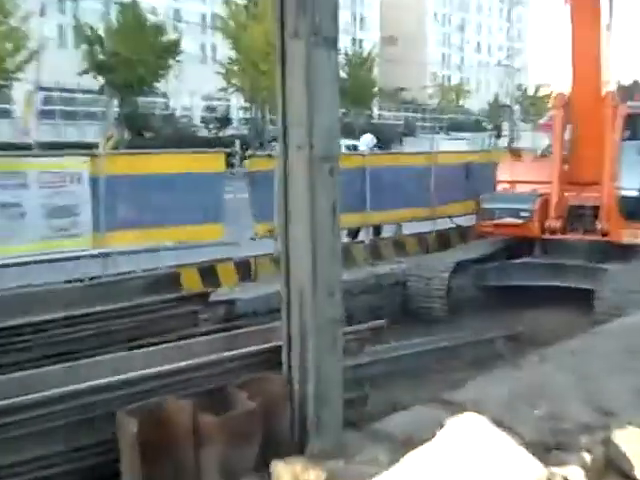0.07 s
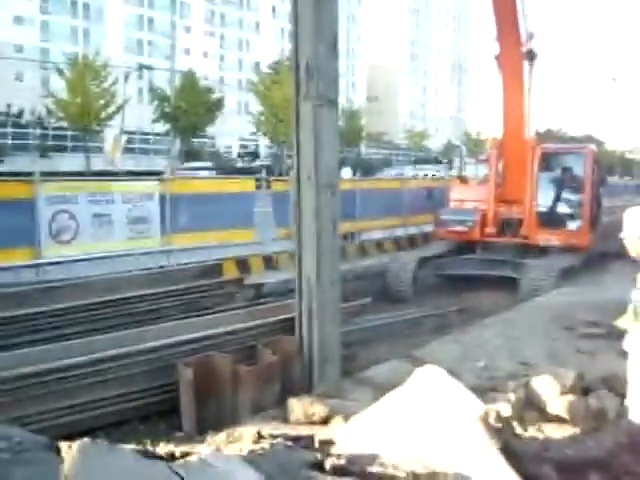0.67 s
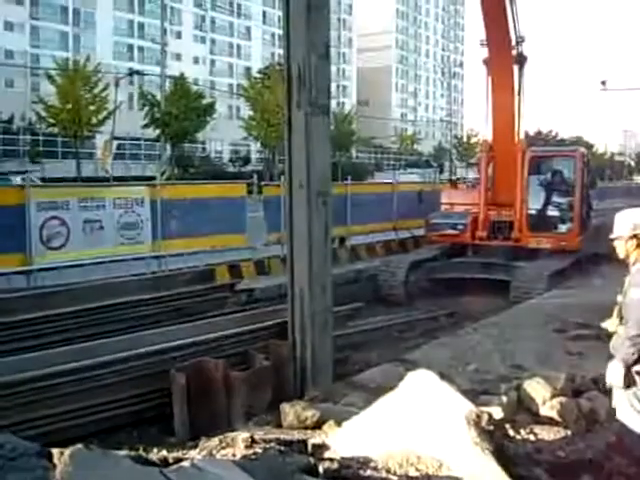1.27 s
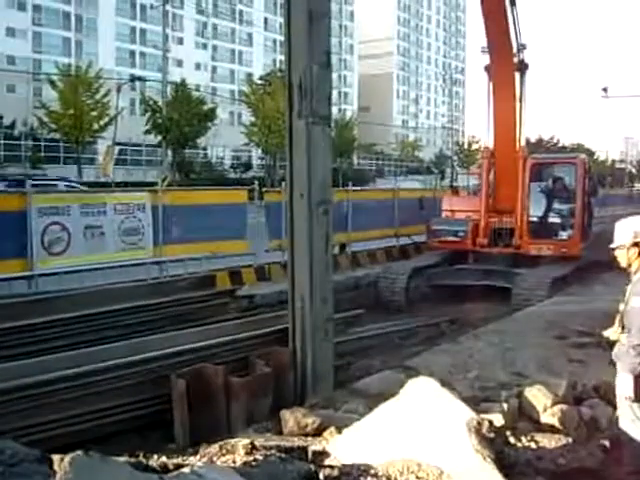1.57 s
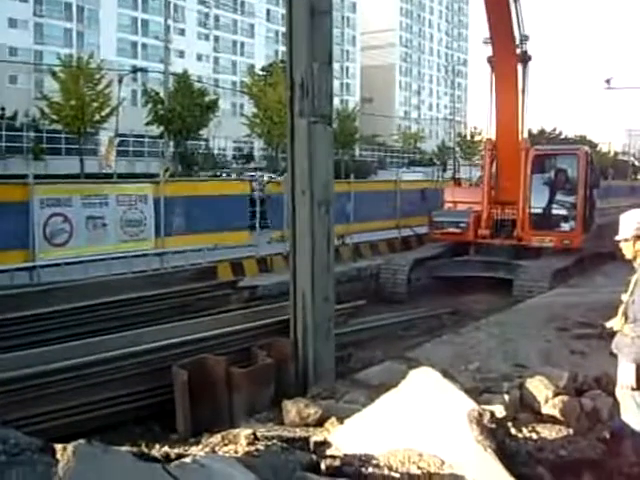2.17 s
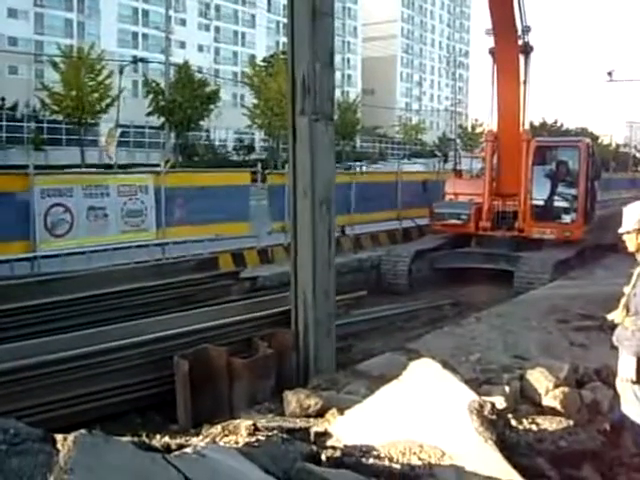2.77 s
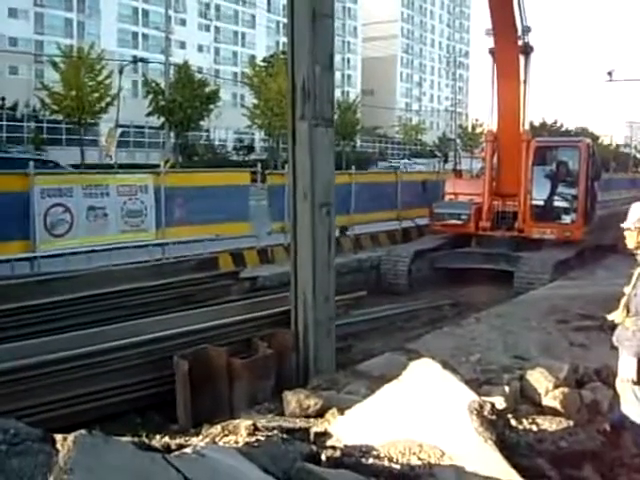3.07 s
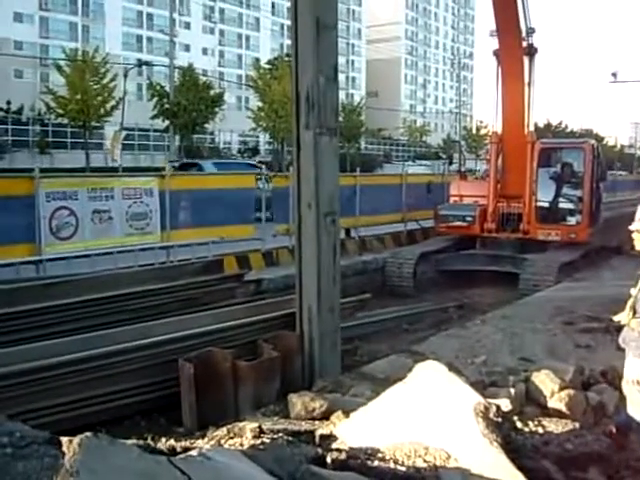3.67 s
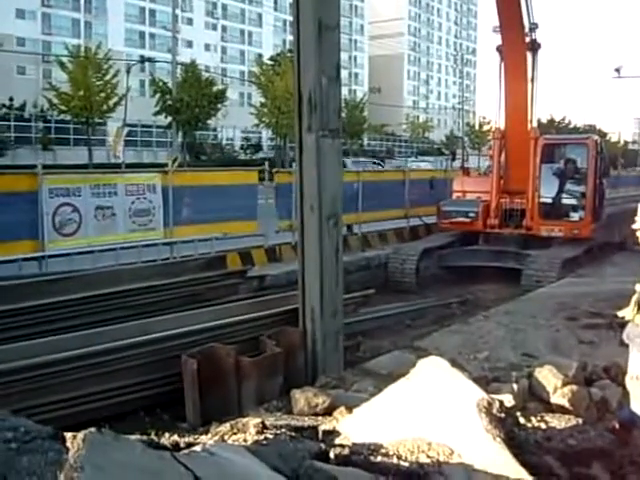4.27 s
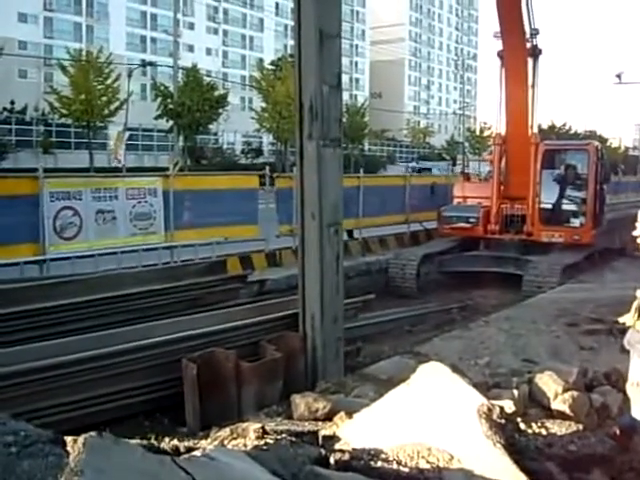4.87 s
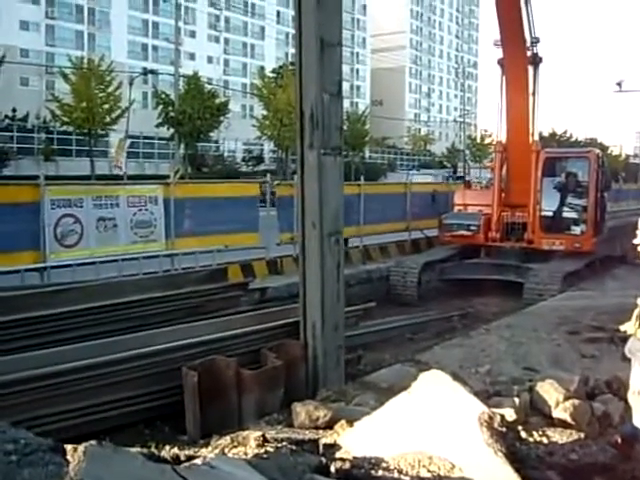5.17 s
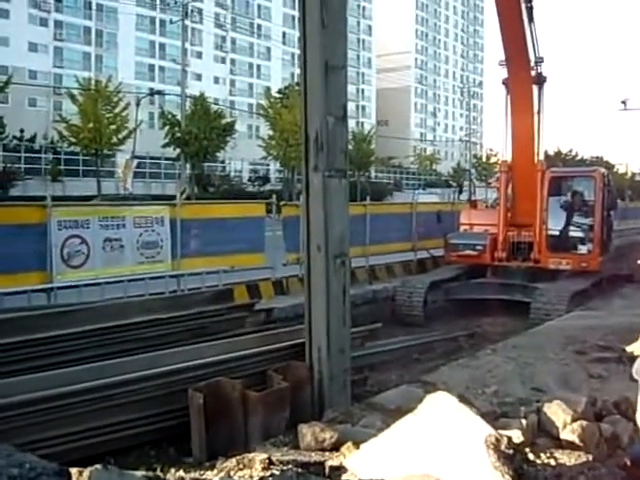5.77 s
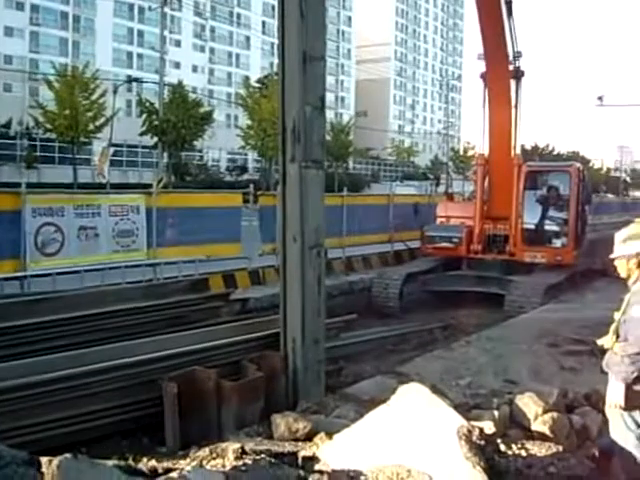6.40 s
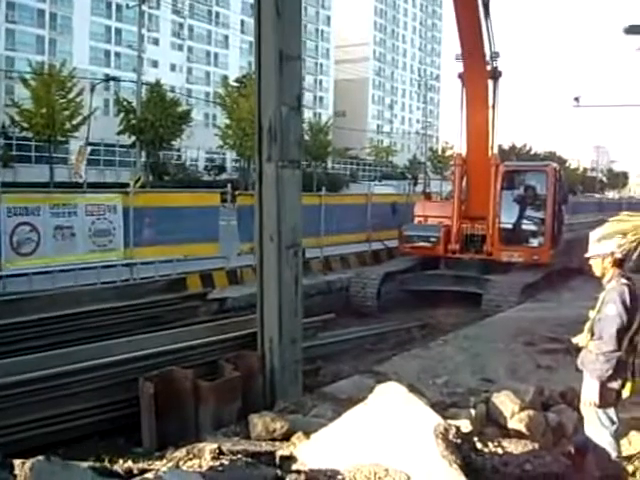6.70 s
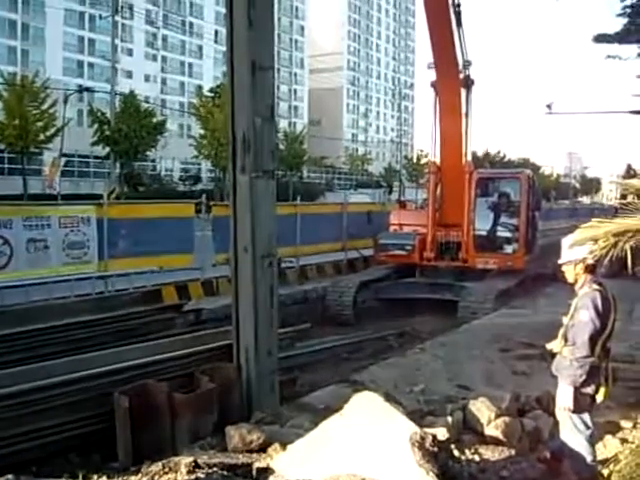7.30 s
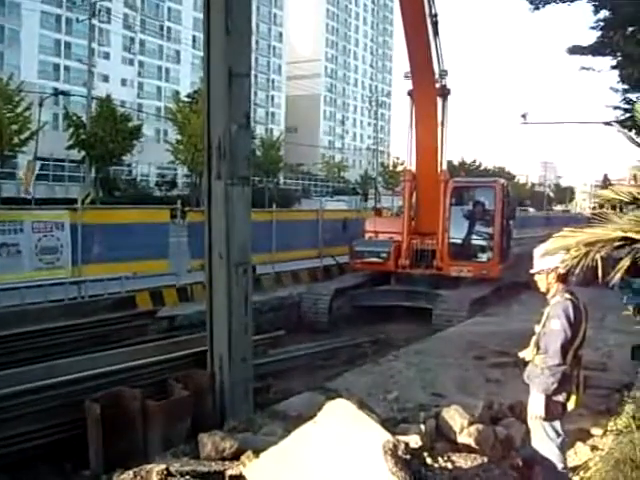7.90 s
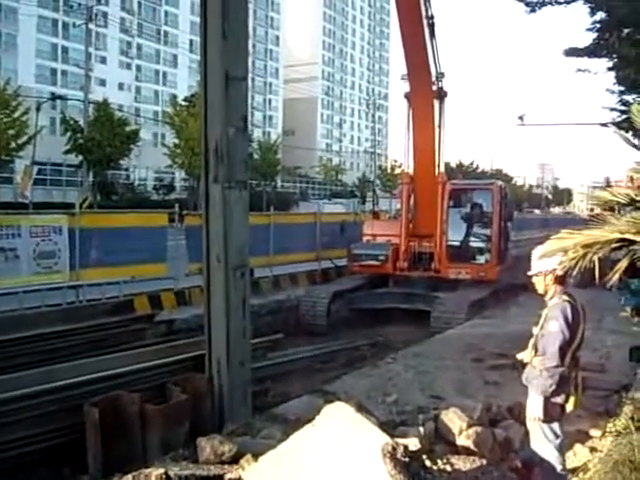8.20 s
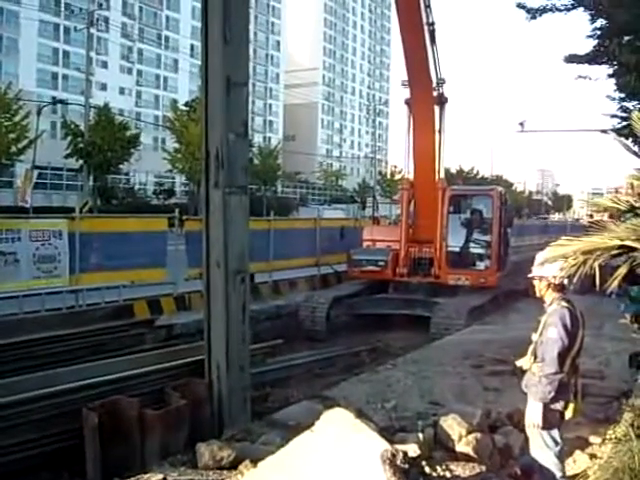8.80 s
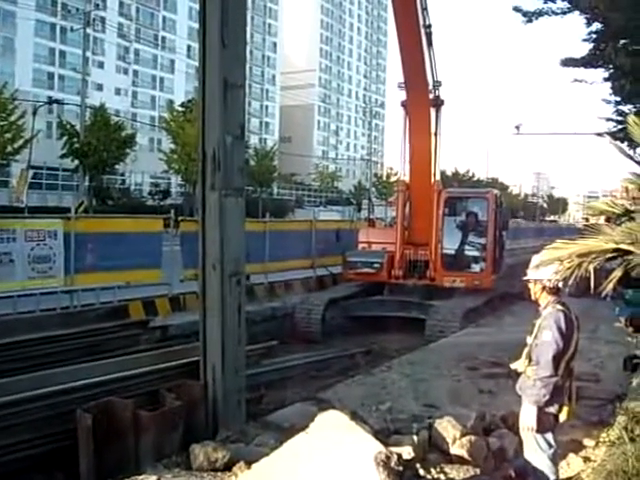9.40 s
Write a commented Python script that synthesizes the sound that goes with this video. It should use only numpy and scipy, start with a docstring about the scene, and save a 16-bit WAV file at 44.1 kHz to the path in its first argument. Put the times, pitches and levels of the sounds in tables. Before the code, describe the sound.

A vibratory pile hammer hums loudly over a diesel excavator, with rapid steel clanking and grinding that ease as the hum rises.

```python
"""Vibratory pile driver

A hammer on an excavator shakes a steel pile into the ground. Its spinning weights hum through
boom and frame. While the pile binds it grinds and clanks once a stroke, twice when wedged.
The load eases: the clanks stop and the hum climbs over the diesel until the pile catches again."""
import sys
import numpy as np
from scipy import signal
from scipy.fft import rfft, irfft, next_fast_len
from scipy.io import wavfile
from scipy.ndimage import map_coordinates

SR = 44100
rng = np.random.default_rng(int(sys.argv[2]) if len(sys.argv) > 2 else 0)


def dump_mix(stems):
    """Bounce the given channels to the path in sys.argv[1] as a 16-bit WAV at rate SR."""
    frames = np.atleast_2d(stems).T  # one column per channel
    limited = np.clip(frames, -1, 1)  # hard clip at full scale
    pcm = np.round(limited * 32767).astype(np.int16)
    wavfile.write(sys.argv[1], SR, pcm)


N = 425565
TIME = np.arange(N) / SR
START_S = 0.888  # silent until here
LOADED_HZ = 36  # shaft speed under load
# Distinct steel-on-steel blows, mostly heavy, with two light knocks.
# Each row: start in seconds, level in dB, ring pitch in Hz.
DISTINCT_BLOWS = [(0.97, -18, 4080), (1.063, -15.5, 4140), (1.087, -13, 3940), (1.109, -13, 4010),
                  (1.122, -11.5, 3870), (1.229, -13.5, 4330), (1.256, -12, 4090), (2.496, -19.5, 4180),
                  (2.58, -16.5, 4730), (2.636, -17, 3940), (2.8, -14.5, 4520), (3.159, -16, 4400),
                  (3.215, -16.5, 4260), (3.268, -17, 4400), (3.728, -18, 4370), (4.043, -17.5, 4020),
                  (4.096, -17, 4170), (4.401, -17.5, 4180), (5.234, -22, 4130), (5.703, -18.5, 4230),
                  (5.815, -27.5, 4460), (7.8, -28.5, 3770), (9.358, -17.5, 5000)]


def amp(db):
    """Decibels to gain."""
    return 10 ** (np.asarray(db) / 20)


def unit(x):
    """Scale to rms 1."""
    return x / np.sqrt(np.mean(x ** 2) + 1e-20)


def curve(rows):
    """(seconds, value) points to one value per sample."""
    return np.interp(TIME, *np.transpose(rows))


def wobble(rate_hz):
    """Smooth random curve, rate_hz knots a second."""
    knots = rng.standard_normal(int(N * rate_hz / SR) + 4)
    coarse_s = TIME[::32]
    return np.interp(TIME, coarse_s, map_coordinates(knots, [coarse_s * rate_hz]))


def filtered(x, response):
    """Zero-phase filter of gain response(hz)."""
    size = next_fast_len(N + SR // 4)
    return irfft(rfft(x, size) * response(np.fft.rfftfreq(size, 1 / SR)), size)[:N]


def noise(spectrum):
    """Noise of rms 1, coloured by (Hz, dB) points."""
    hz, db = np.transpose(spectrum)
    colour = lambda f: amp(np.interp(np.log(f + 1), np.log(hz), db))
    return unit(filtered(rng.standard_normal(N), colour))


def resonances(modes, hz):
    """Gain of steep-skirted (Hz, half-width Hz, dB) modes."""
    return np.sqrt(sum(amp(db) ** 2 / (1 + ((hz - centre) / width) ** 2) ** 2
                       for centre, width, db in modes))


def machine(speed_hz, turns, force_db):
    """Pile rumble, diesel and gear roar, and hydraulic hiss, all beating with the shaft."""
    # Spectra. Each row: frequency in Hz, relative density in dB.
    rumble_spectrum = [(22, -60), (40, -21), (80, -22), (115, -5), (165, 5), (230, 3), (310, 5.5),
                       (400, -4.5), (550, -28), (900, -48)]
    roar_spectrum = [(300, -17.5), (520, -11), (660, 1), (730, -6), (800, 0), (880, -7.5), (1550, -7.5),
                     (1850, -10), (2600, -31.5), (4500, -41)]
    hiss_spectrum = [(1500, -4), (2600, -0.5), (3500, 3), (4400, 1.5), (5300, -4), (6300, -7.5),
                     (7800, -15), (10500, -15.5), (12000, -92)]
    # Diesel and gears. Each row: time in seconds, level in dB.
    roar_levels = [(.9, -26), (2, -26), (3, -33.5), (4.2, -26), (5.3, -27.5), (6.3, -31), (7.5, -29.5),
                   (8.8, -30), (9.35, -25)]
    rumble_db = -34 - 0.78 * (speed_hz - LOADED_HZ) + force_db  # fades as the load eases
    hiss_db = -39.5 + 0.2342 * (speed_hz - LOADED_HZ)
    clatter_db = 1.23 * np.cos(2 * np.pi * 3 * turns) + wobble(120)
    pulse_db = 1.5 * np.cos(2 * np.pi * turns)
    rumble = amp(rumble_db) * unit(noise(rumble_spectrum) * amp(pulse_db))
    roar_db = curve(roar_levels) + 0.17 * wobble(6.4)
    roar = amp(roar_db) * unit(noise(roar_spectrum) * amp(clatter_db))
    hiss = amp(hiss_db) * unit(noise(hiss_spectrum) * amp(1.28 * clatter_db))
    return rumble + roar + hiss


def squeaks(width_hz=1000, grit_db=4):
    """Steel rubs on steel: brief, gritty swells of many close modes."""
    # Each row: centre in seconds, half-length in seconds, pitch in Hz, level in dB.
    rubs = [(2.428, 0.018, 6340, -35.5), (4.794, 0.022, 5850, -32), (4.865, 0.031, 6200, -37),
            (5.585, 0.13, 8350, -43.5), (5.724, 0.095, 3140, -36), (5.905, 0.046, 9250, -47),
            (7.231, 0.039, 3460, -35), (9.397, 0.068, 5015, -38), (9.427, 0.22, 6650, -36),
            (9.52, 0.22, 2400, -33.5)]
    band = lambda hz: 1 / (1 + (2 * hz / width_hz) ** 2)
    real, imag = (unit(filtered(rng.standard_normal(N), band)) for _ in range(2))
    modes = (real + 1j * imag) * unit(amp(grit_db * wobble(250)))
    out = np.zeros(N)
    for centre_s, half_s, hz, db in rubs:
        near = np.abs(TIME - centre_s) < half_s
        t = TIME[near] - centre_s
        envelope = amp(db) * np.cos(np.pi / 2 * t / half_s) ** 2
        out[near] += envelope * np.real(modes[near] * np.exp(2j * np.pi * hz * t))
    return out


def binding(attack_s=0.034, release_s=0.054):
    """The pile binds on its neighbours. Returns knock gain, grind gain and return-stroke share."""
    # Each row: start in seconds, length in seconds, knock in dB, grind in dB, return-stroke share 0-1.
    binds = [(0.977, .06, -23.5, -27, .6), (1.054, 0.098, -18.5, -23, 0.65),
             (1.178, 0.24, -21.5, -26.5, 0.59), (1.45, 0.14, -28.5, -29, 0.57), (1.624, 0.11, -35, -25, 1),
             (1.817, 0.25, -26.5, -28.5, 0.26), (2.094, 0.31, -27.5, -31.5, 0.24),
             (2.47, 0.73, -20.5, -29, 0.14), (3.206, .13, -21, -25, 0.22), (3.459, 0.14, -24, -26, 0.06),
             (3.817, 0.29, -22, -28, 0.07), (4.202, 0.26, -24, -28, .05), (4.497, 0.27, -36, -30, .1),
             (4.868, 0.18, -26, -24.5, 0.98), (5.193, 0.35, -31.5, -30.5, 1), (5.426, .12, -26, -26, 0.6),
             (5.596, 0.082, -23, -45, 0), (9.325, 0.25, -27, -39, 0.9)]
    start_s, length_s, knock_db, grind_db, share = np.transpose(binds)[:, :, None]
    grip = np.clip((TIME - start_s) / attack_s + 0.5, 0, 1)
    grip *= np.exp(-np.maximum(TIME - start_s - length_s, 0) / release_s)
    knock = grip * amp(knock_db)
    wedged = (knock * share).sum(axis=0) / (knock.sum(axis=0) + 1e-9)
    return knock.max(axis=0), (grip * amp(grind_db)).max(axis=0), wedged


def scraping(knock, wedged, level_db=-7):
    """A pile wedged enough to touch on both strokes also scrapes brightly."""
    # Each row: frequency in Hz, relative density in dB.
    spectrum = [(1800, -1.5), (3300, 10), (6000, -1), (8500, -4), (11500, -19)]
    grit = amp(5 * wobble(300))
    return amp(level_db) * knock * wedged * unit(noise(spectrum) * grit)


def grinding(turns, grind, force_db, rough_db=1.5, stroke_db=2, patchy_db=3, free_db=-34.5):
    """Rough steel slips on every stroke and rings the pile, lightly even when it slides freely."""
    # Each row: frequency in Hz, half-width in Hz, relative level in dB.
    pile_modes = [(688, 42, 7.5), (779, 16, 3), (915, 33, 4), (1232, 47, 1.5), (1257, 90, -1.5),
                  (1478, 11, 5), (1536, 160, -5), (1814, 250, 1), (2240, 102, -6)]
    slips = rng.standard_normal(N) * amp(rough_db * wobble(220) + stroke_db * np.cos(2 * np.pi * turns))
    ringing = np.zeros(N)
    for mode in pile_modes:
        ringing += amp(patchy_db * wobble(6.8)) * filtered(slips, lambda hz: resonances([mode], hz))
    return np.hypot(grind, amp(free_db + force_db)) * unit(ringing)


def wall_ring(crashes, decay_s=0.012):
    """The pile's wall rings on briefly after each contact."""
    # Each row: frequency in Hz, relative level in dB.
    wall_modes = [(3480, 26), (4050, 10), (4255, -28), (4480, -34), (4720, 23), (5006, 23.5)]
    t = np.arange(SR // 10) / SR
    response = sum(amp(db) * np.sin(2 * np.pi * hz * t) for hz, db in wall_modes) * np.exp(-t / decay_s)
    return np.std(crashes) * unit(signal.fftconvolve(crashes, response)[:N])


def knocks(turns, knock, wedged, scatter_db=2.44, jitter_s=0.00055):
    """Contacts (s, dB, Hz) on the down and return strokes, in step with the distinct blows."""
    blow_s, _, blow_hz = np.transpose(DISTINCT_BLOWS)
    contact_turns = np.unwrap(np.interp(blow_s, TIME, turns) % 1, period=1)
    half_stroke = np.floor(2 * (turns - np.interp(TIME, blow_s, contact_turns)))
    at = np.flatnonzero(np.diff(half_stroke) > 0) + 1
    chance = rng.standard_normal((len(at), 3))
    start_s = TIME[at] + jitter_s * chance[:, 0]
    gain = knock[at] * np.where(half_stroke[at] % 2, wedged[at], 1)
    db = 20 * np.log10(gain + 1e-9) + scatter_db * chance[:, 1]
    spread = 0.039 + 0.095 * wedged[at]  # a wedged pile touches in many places
    hz = np.interp(start_s, blow_s, blow_hz) * np.exp(spread * chance[:, 2])
    clear_of_blows = np.abs(start_s[:, None] - blow_s).min(axis=1) > 0.007
    return np.column_stack([start_s, db, hz])[clear_of_blows & (start_s > START_S)]


def clanks(turns, knock, wedged, attack_s=0.00042, decay_s=0.0058, tail_s=0.047):
    """Each contact is a broad crash and a short pitched clink; the site adds a tail."""
    # Each row: frequency in Hz, relative density in dB.
    crash_spectrum = [(300, -11.5), (700, -52), (1750, -2), (2600, -4.5), (3500, 1), (4500, 2),
                      (5600, -0.5), (9000, -14), (11500, -18)]
    t = np.arange(SR // 10) / SR
    direct = (1 - np.exp(-t / attack_s)) * np.exp(-t / decay_s)
    tail = amp(-17) * (1 - np.exp(-t / decay_s)) * np.exp(-t / tail_s)
    crash_env = np.hypot(direct, tail)
    clink_env = 1.45 * (1 - np.exp(-t / 0.0008)) * np.exp(-t / 0.004)
    waver_rad = 1.05 * wobble(700)  # the contact slides while it rings
    power, clinks = np.zeros(N), np.zeros(N)
    for start_s, db, hz in np.vstack([DISTINCT_BLOWS, knocks(turns, knock, wedged)]):
        first = round(start_s * SR)
        span = slice(first, first + len(t))
        size = len(power[span])
        power[span] += (amp(db) * crash_env[:size]) ** 2
        clinks[span] += amp(db) * clink_env[:size] * np.sin(2 * np.pi * hz * t[:size] + waver_rad[span])
    crashes = np.sqrt(power) * noise(crash_spectrum)
    return amp(-1.5) * crashes + amp(2) * clinks + amp(-8) * wall_ring(crashes)


def swell_db(order, edge_s=0.18):
    """Level offset of one harmonic of the hum: ramps in, holds, ramps out."""
    # Each row: start in seconds, length in seconds, offset in dB, harmonic number.
    swells = [(1.102, 0.46, 8.5, 7), (1.16, 0.42, 10, 12), (1.847, 2.4, 3.5, 8), (3.804, 1.2, 5.5, 2),
              (5.6, 1.52, 3.5, 2), (3.756, .8, 4.5, 6), (5.854, 0.21, 8.5, 19), (6.55, 1.3, 6.5, 10),
              (7.1, .55, 7, 11), (7.11, 0.66, 9, 15), (7.7, 0.74, 4.5, 4), (7.695, 0.66, 4.5, 9),
              (8.203, 0.96, 6.5, 5), (8.45, 1.1, -1, 22), (8.3, .85, 5.5, 20)]
    offset_db = np.zeros(N)
    for start_s, length_s, db, harmonic in swells:
        if harmonic == order:
            inside_s = np.minimum(TIME - start_s, start_s + length_s - TIME)
            offset_db += db * np.clip(inside_s / edge_s + 0.5, 0, 1)
    return offset_db


def hum(speed_hz, turns, force_db, dispersion_rad=1.3):
    """Harmonics of the spinning weights swell as they glide through resonances of boom and frame."""
    # Each row: frequency in Hz, half-width in Hz, level in dB.
    boom_modes = [(37.6, 9.5, -48), (83, 8, -46.5), (99.3, 4.1, -39.5), (123, 7.9, -42), (139.6, 3, -42),
                  (153.5, 14, -39), (191.3, 9.8, -36), (218.8, 13, -35.5), (240, 6.3, -36.5),
                  (294.2, 21.5, -36), (332.4, 13.7, -36), (373, 8.3, -42.5)]  # ground, pile and boom together
    frame_modes = [(334, 23, -0.5), (376, 7, -2.5), (444.5, 27, -3.5), (507.4, 15.4, -6), (592, 15.5, -1),
                   (650, 24.4, 0), (794, 22, -2), (920, 9, -9), (972, 11, -9), (1070, 25, -2),
                   (1500, 60, -9)]
    grid_hz = np.arange(SR // 8)
    boom = resonances(boom_modes, grid_hz)
    frame = resonances(frame_modes, grid_hz) + 0.039
    # Bending waves disperse, spreading each stroke into a drone.
    phase = lambda order: order * 2 * np.pi * (turns % 1) + dispersion_rad * order ** 2
    # Freely spinning weights run truer.
    unsteady = np.interp(speed_hz, [speed_hz.min(), speed_hz.max()], [0.057, 0.038])
    out = np.zeros(N)
    for order in range(1, 9):
        flutter_db = 1.6 * unsteady / unsteady.max() * wobble(12)
        gain = amp(force_db + swell_db(order) + flutter_db) * np.interp(order * speed_hz, grid_hz, boom)
        out += gain * np.sin(phase(order) + 0.3 * wobble(3))
    frame_db = -43.5 + 0.806 * (speed_hz - LOADED_HZ) + force_db  # sings more at speed
    for order in range(9, 32):
        drift_db = 2.5 * wobble(6.5)  # the pile shifts
        gain = amp(frame_db + swell_db(order) + drift_db) * frame[np.rint(order * speed_hz).astype(int)]
        out += gain * np.sin(phase(order) + unsteady * order * wobble(13))
    return np.sqrt(2) * out


def scene():
    """One shaft speed paces hum, machine noise, clanks and grinding."""
    # Spinning weights. Each row: time in seconds, stroke rate in Hz.
    shaft_speeds = [(0.9, 42.2), (1.09, 42.1), (1.65, 38.7), (2.24, 36.5), (2.97, 36.2), (3.31, 36.4),
                    (3.58, 37.6), (3.72, 37.5), (4.14, 39.3), (4.94, 38.8), (6.28, 42.6), (6.63, 44.3),
                    (7.19, 44.6), (7.82, 47.1), (8.24, 48.0), (9.06, 48.6), (9.55, 45.8), (9.65, 46.0)]
    # Shaking force. Each row: time in seconds, level in dB.
    forces = [(.9, -1), (1.27, 2.5), (1.8, 0.5), (3.8, -1), (5.2, -0.5), (6.6, -1), (7.9, 0), (9.65, 0)]
    speed_hz, force_db = curve(shaft_speeds), curve(forces)
    turns = np.cumsum(speed_hz) / SR
    knock, grind, wedged = binding()
    steel = clanks(turns, knock, wedged) + grinding(turns, grind, force_db)
    steel += scraping(knock, wedged) + squeaks()
    return (hum(speed_hz, turns, force_db) + steel + machine(speed_hz, turns, force_db))[None]


def record(dry, low_hz=32.0, top_hz=11250):
    """High-pass, mute before START_S, steep low-pass."""
    gated = filtered(dry[0], lambda hz: hz ** 8 / (hz ** 8 + low_hz ** 8)) * (TIME > START_S)
    return filtered(gated, lambda hz: 1 / (1 + (hz / top_hz) ** 120))[None]


dry = scene()
out = record(dry)
dump_mix(out)
```